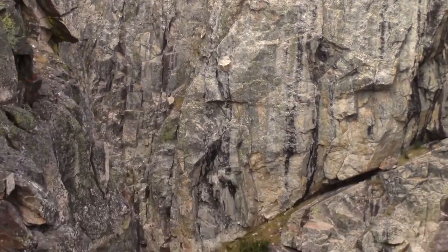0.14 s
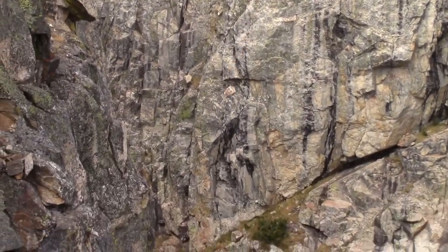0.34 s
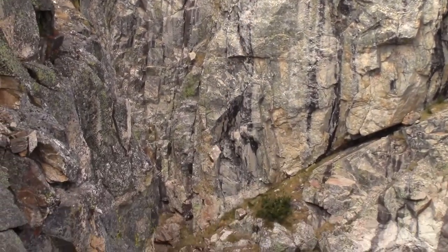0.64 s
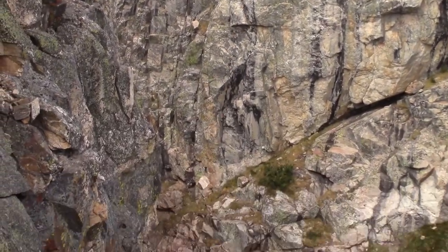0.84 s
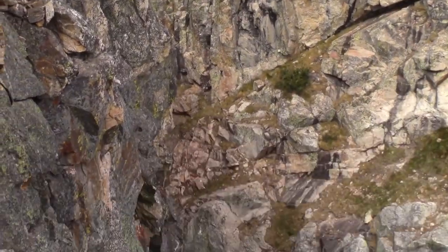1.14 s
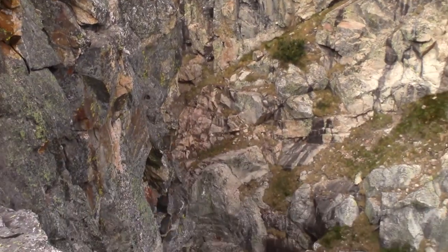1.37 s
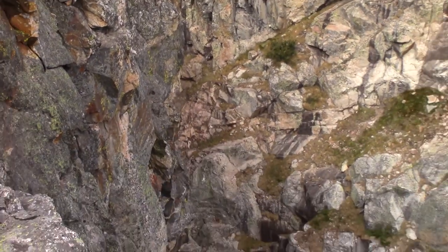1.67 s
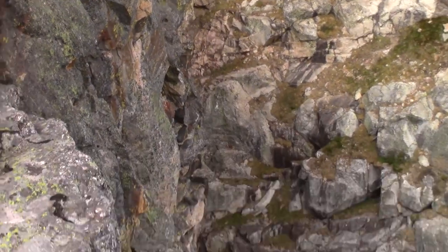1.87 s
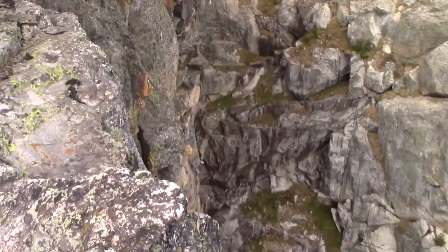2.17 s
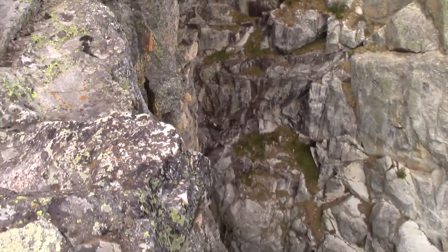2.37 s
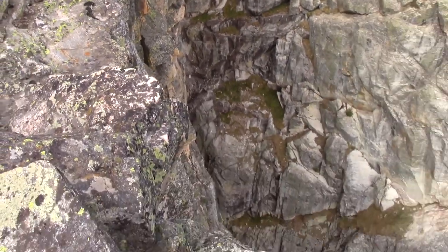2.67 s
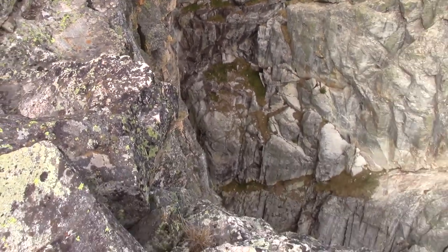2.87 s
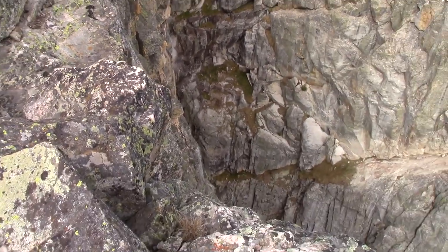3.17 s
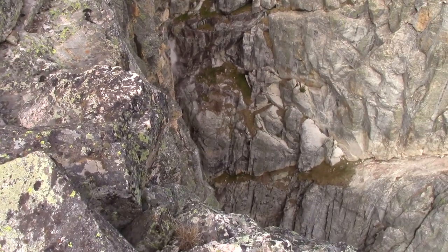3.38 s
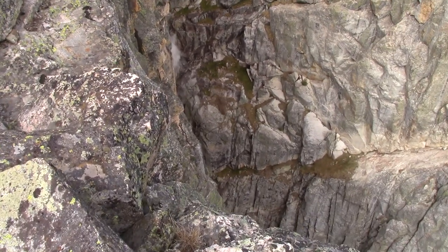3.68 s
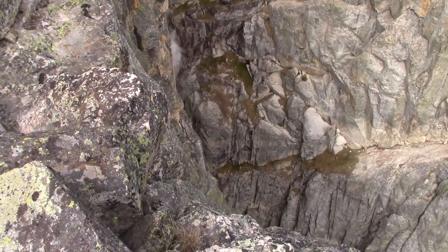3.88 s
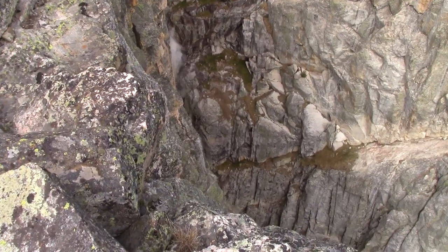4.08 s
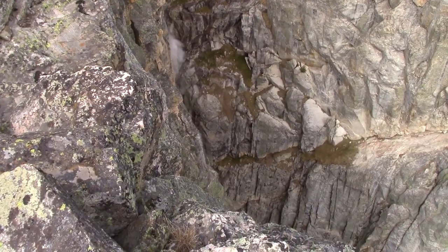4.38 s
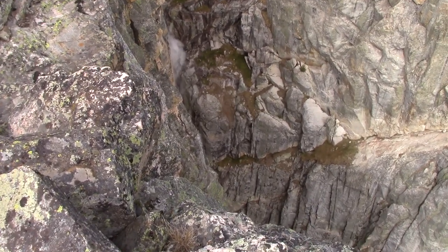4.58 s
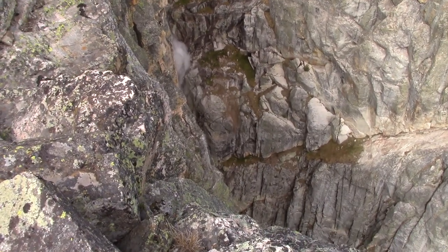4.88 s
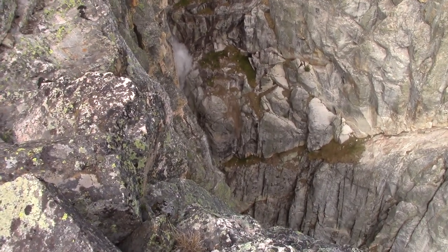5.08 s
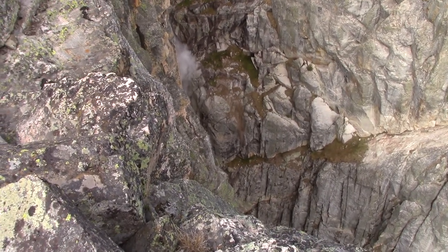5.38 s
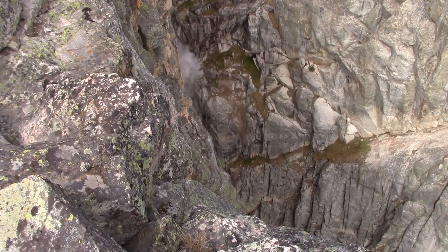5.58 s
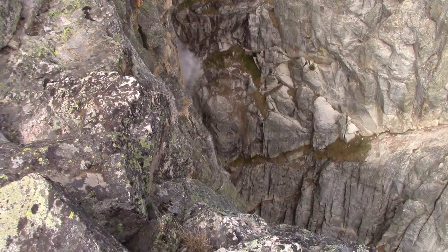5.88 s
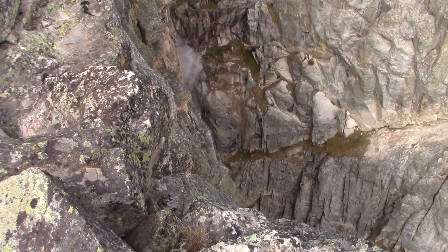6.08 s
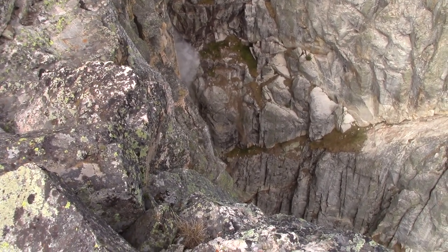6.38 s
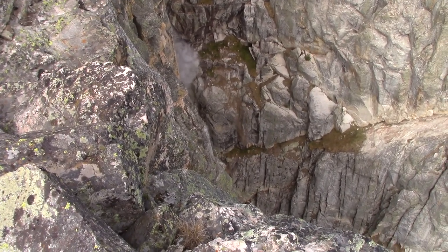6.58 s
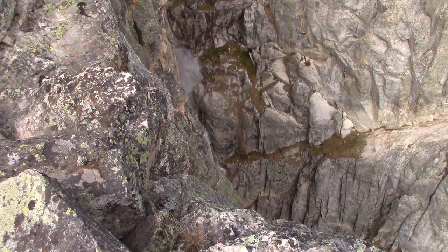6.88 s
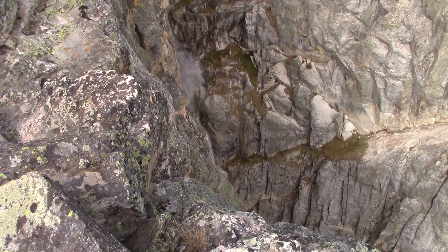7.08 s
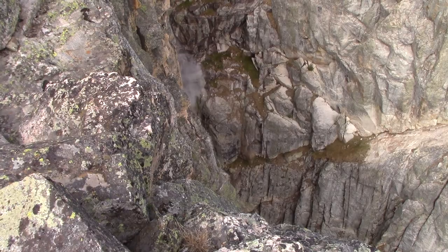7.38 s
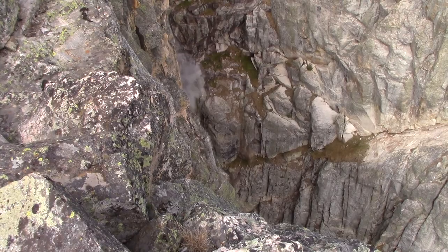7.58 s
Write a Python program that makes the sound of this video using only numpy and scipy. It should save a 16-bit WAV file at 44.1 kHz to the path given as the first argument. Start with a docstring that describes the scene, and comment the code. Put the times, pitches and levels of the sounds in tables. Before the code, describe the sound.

In a rocky gully, a brief gust buffets the microphone and a few loose stones click nearby over a faint trickle of grit. About two seconds in, a boulder smashes loudly far below. A slide of debris follows, a hollow, surging roar dotted with dry cracks, crunches and dull thuds. The cliff walls add a short echo, and the slide eases a little but keeps going.

```python
"""In a cliff gully, wind buffets the microphone and loose stones knock; then a boulder smashes far below.
A slide of debris roars on between the walls: countless collisions superpose into noise, and single
blows and dull thuds stand out of it. Rock is heavily damped, so each blow is a snap and a crunch
that hardly rings. The walls reflect the blows and thuds, and the cleft adds its hollow resonance."""
import sys
import numpy as np
from scipy import signal
from scipy.io import wavfile
from scipy.ndimage import uniform_filter1d, minimum_filter1d

SR = 44100
rng = np.random.default_rng(int(sys.argv[2]) if len(sys.argv) > 2 else 0)


def file_out(sig):
    """Save sig as 16-bit WAV at sys.argv[1]."""
    # one column per channel
    cols = np.atleast_2d(sig).T
    # limit, then scale
    lim = np.clip(cols, -1, 1)
    pcm = np.round(lim * 32767).astype(np.int16)
    wavfile.write(sys.argv[1], SR, pcm)


N = 341334


# rock striking rock: (time [s], level [dB], centre frequency [Hz], crunch length [ms])
ROCK_BLOWS = [(0.147, -42, 2000, 4), (0.166, -36, 1400, 3.4), (0.1847, -25.5, 3030, 4),
              (0.267, -23.5, 1380, 6.9), (0.2839, -29, 1620, 9.4), (0.441, -27.5, 2370, 8.4),
              (0.619, -33.5, 1730, 7.7), (0.675, -36, 2000, 4), (0.776, -41, 5000, 2.5),
              (0.8432, -31.5, 3870, 1.4), (0.8593, -29.5, 1230, 6), (1.021, -33.5, 3130, 9.2),
              (1.044, -21.5, 1200, 23), (1.066, -27, 5300, 2.6), (1.093, -40, 3000, 4),
              (1.112, -35.5, 1780, 25), (1.1675, -31, 1900, 10), (1.194, -30, 1800, 9),
              (1.2329, -38, 3600, 6), (1.2962, -32.5, 4000, 5.6), (1.32, -39, 3000, 11),
              (1.335, -28, 1210, 32), (1.338, -47, 5760, 6), (1.346, -29, 1270, 9), (1.352, -41, 5100, 13),
              (1.4236, -37, 2680, 10), (1.481, -34.5, 2070, 5.4), (1.5263, -33, 3300, 9.7),
              (1.534, -37, 1400, 13), (1.559, -49, 6500, 3), (1.5706, -27, 1360, 8.6),
              (1.721, -27, 2040, 5.8), (1.7697, -18.5, 1900, 10.5), (1.808, -48, 4600, 5),
              (1.83, -36.5, 2960, 12), (1.856, -32, 3460, 4.3), (1.9765, 2.5, 1110, 11),
              (1.9855, -1, 1350, 4.5), (2.0074, -6, 795, 4.2), (2.122, -9, 650, 17), (2.247, -4, 630, 20),
              (2.354, -7, 800, 9), (2.531, -21, 5500, 2.5), (2.621, -6.5, 1600, 2.4),
              (2.6403, -4.5, 2600, 2.8), (2.6928, -6, 2620, 3.6), (2.714, -13, 600, 8),
              (2.8045, 0.8, 1900, 3.4), (2.823, -5, 2400, 2), (2.889, -17, 3200, 2.4),
              (2.899, -8, 1600, 3.6), (2.978, -3, 950, 8), (2.991, -17, 3800, 2.6), (3.016, -12, 660, 10),
              (3.035, -15, 3400, 4.7), (3.0858, -11, 2010, 4.2), (3.093, -10, 1080, 5.5),
              (3.1133, -12, 2640, 9.8), (3.3225, -2.5, 950, 3.6), (3.391, -9, 1200, 3.8),
              (3.436, -10, 2000, 8.2), (3.4658, -7.5, 1600, 4.5), (3.5264, -6.5, 2550, 1.8),
              (3.5405, -8, 800, 6), (3.546, -4, 950, 11), (3.5885, 1, 2100, 4), (3.6063, -4, 2340, 2.6),
              (3.78, -8, 1250, 4.7), (3.8579, -10.5, 750, 5.1), (3.8852, -12, 2660, 3.5),
              (3.979, -6, 1320, 2), (4.099, -14, 1320, 5.2), (4.1455, -1.5, 1100, 3.6),
              (4.2315, -2.5, 710, 4.8), (4.243, -14, 660, 12), (4.233, -10, 2300, 3.5),
              (4.31, -17, 1610, 3.3), (4.3395, -5, 1900, 3.6), (4.345, -4, 700, 5.8), (4.41, -7, 1490, 5),
              (4.4255, -2, 1400, 6), (4.436, -8, 600, 9), (4.5, -8, 520, 11), (4.52, -2, 1950, 2.4),
              (4.5707, -12, 1170, 4.4), (4.6105, -20, 4500, 3.1), (4.6176, -0.5, 720, 4.6),
              (4.628, -9, 640, 26), (4.766, -10.5, 3270, 3.2), (4.8592, -10.5, 1020, 10.2),
              (5.0088, -7.5, 1240, 1.5), (5.0273, -8, 960, 3.1), (5.0637, -11, 1190, 7),
              (5.1245, -12.5, 3430, 3.8), (5.1466, -13.5, 725, 5.7), (5.2695, -7, 1900, 6),
              (5.253, -16, 2450, 4.5), (5.3514, -10.5, 1270, 16), (5.4012, -8, 1440, 2.5),
              (5.5015, -16, 4170, 2.5), (5.744, -10.5, 1100, 3.5), (5.7988, -10.5, 1740, 2.7),
              (6.0698, -8.5, 800, 5.5), (6.1522, -8, 1450, 5.3), (6.342, -9.5, 1340, 8.9),
              (6.415, -10, 2100, 5.6), (6.4315, -1, 2050, 2.8), (6.6501, -11, 1350, 3.5),
              (6.732, -15.5, 676, 5), (6.7755, -18, 5400, 4), (6.8965, -12, 754, 6),
              (7.043, -13, 1620, 2.8), (7.1185, -3, 1700, 2.9), (7.1195, -11, 3150, 4),
              (7.149, -13, 990, 4.1), (7.4939, -16.5, 3200, 4.1), (7.665, -13.5, 686, 5)]
# thin splinters cracking off: (time [s], level [dB], centre frequency [Hz])
ROCK_SPLINTERS = [(2.451, -29, 6500), (2.687, -29, 6500), (2.804, -29, 7500), (3.034, -25, 6500),
                  (3.286, -33, 6500), (3.5894, -15, 7950), (3.9215, -37, 6500), (4.111, -36, 7000),
                  (4.232, -30, 7000), (4.389, -36, 5500), (4.434, -26, 6000), (4.5134, -31, 7500),
                  (4.609, -28, 8500), (5.161, -26, 6500), (5.5243, -32, 6500), (6.432, -28, 7500),
                  (6.9706, -33, 6500), (7.1177, -32, 6800), (7.407, -34, 6500)]

def blows(splinter_ms=1.8, scrape_ms=13):
    """Damped impact: a snap and a gritty crunch; rock hardly rings, so the spectrum is one broad hump."""
    out, ms = np.zeros(N), np.arange(3000) / SR * 1000
    crash_s = DEBRIS_WAVES[0][0]
    for s, db, hz, length in ROCK_BLOWS + [(*row, splinter_ms) for row in ROCK_SPLINTERS]:
        near = s < crash_s  # the first loose stones are close by and keep more of their range
        octaves = 0.25 + 0.03 * length + 0.067 * near
        dull_db = 0 if near else -1.5  # air absorption over distance
        decay_ms = max(length - 2.2, .2)
        grit = rng.standard_normal(len(ms)) * rng.exponential(1, len(ms)) ** 0.57
        crunch = 0.34 * grit * (np.exp(-(ms / decay_ms) ** 3) + 0.21 * np.exp(-ms / (decay_ms + 4)))
        scrape = max(length / scrape_ms, 1) - 1  # a long crunch swells in after a softer snap
        crunch *= 1 - np.exp(-(ms + .05) / (2.4 * scrape + .01))
        crunch[0] = 1 / (1 + 1.3 * scrape)  # the snap
        low, high = hz / 2 ** octaves, min(hz * 2 ** octaves, 10000)
        hump = [(low / 8, -52), (low / 2, -12), (low, -3), (hz, 0), (high, -6),
                (1.675 * high, -24 + dull_db), (5.1 * high, -72 + 2 * dull_db)]
        add(out, s, peaked(coloured(crunch, hump), db))
    return out


# roar of sliding rock, before its bands are levelled: (frequency [Hz], relative level [dB])
ROAR_SPECTRUM = [(24, -93), (40, -30), (110, -22), (241, -7.5), (287, -6), (397, -8.5), (565, 2),
                 (654, 3.5), (779, -2), (1690, -4.5), (3150, -12.5), (4820, -22.5), (8990, -41.5),
                 (14100, -61.5), (15600, -69)]

def debris(drift_db=2.5):
    """Superposition: countless stones of many sizes collide, and distance blurs them into a roar."""
    edges = np.geomspace(100, 12800, 8)
    clatter = evened(sum(gain_of(-1.4 * np.log2(low / 800) * (low > 800)) * stones((low, high))
                         for low, high in zip(edges, edges[1:])))
    collisions = (rng.standard_normal(N) + 0.4 * clatter) * gain_of(0.75 * lumps(samples=1000))
    hz, spectrum = np.fft.rfftfreq(N, 1 / SR), np.fft.rfft(coloured(collisions, ROAR_SPECTRUM))
    lowpasses = [1 / (1 + (hz / edge) ** 8) for edge in (420, 620, 850, 1800, 3500, 1e6)]
    bands = np.diff(lowpasses, axis=0, prepend=0)
    bass, low_boom, high_boom, body, upper, treble = (np.fft.irfft(spectrum * b, N) for b in bands)
    lean = gain_of(drift_db * lumps(samples=2500))  # the hollow note leans now higher, now lower
    boom = low_boom * lean + high_boom / lean
    gains = flow()
    gains[0] *= gain_of(1.95 * lumps(samples=1500))  # the few big blocks make the bass come in lumps
    return sum(gain * evened(band) for gain, band in zip(gains, (bass, boom, body, upper, treble)))


def stones(band_hz, per_s=260, spread_db=2.5):
    """Poisson process: stones of one size click at random, mostly softly, a few loudly."""
    clicks = gain_of(spread_db * np.minimum(rng.exponential(1, N), 4)) * (rng.random(N) < per_s / SR)
    clicks *= rng.uniform(-0.96, 1, N)
    return signal.sosfilt(signal.butter(2, band_hz, "band", fs=SR, output="sos"), clicks)


# loose grit trickling, heard before the crash: (time [s], level [dB], weight of big stones [dB])
GRIT_TRICKLE = [(0, -57.5, 8.5), (0.45, -53, 2), (0.85, -60, 4), (1.05, -58, 4), (1.21, -48, -0.5),
                (1.36, -49.5, -4), (1.6, -51.5, 2), (1.8, -53, -2), (1.97, -46.5, 3)]
# the crash, its rumble, its return from the far walls, the long slide, then surges within it:
# (time [s], rise [s], level [dB], decay rate [dB/s], weight of big blocks [dB])
DEBRIS_WAVES = [(1.974, 0.003, -11.5, 158, 3), (1.98, 0.065, -26, 31, 16), (2.05, 0.18, -14.5, 18.5, 1),
                (2.3, 0.31, -29, 0.16, 0.5), (3.0, 0.22, -26, 22, -4), (3.38, 0.096, -21, 26.5, -2),
                (3.72, 0.058, -22.5, 25, -3.5), (4.07, 0.072, -22.5, 10, 4.5), (4.33, 0.29, -26, 47, 6.5),
                (4.85, 0.056, -28.5, 26, 4.5), (5.32, 0.11, -25, 15, 0), (5.72, 0.12, -29, 25, 9.5),
                (6.0, 0.065, -22.5, 50, 5), (6.25, 0.13, -26.5, 12, 2), (6.7, 0.37, -34.5, -3.5, 12),
                (7.58, 0.16, -27.5, 12, -5)]
# fine grit bursting, then spraying on: (time [s], rise [s], hold [s], level [dB], decay rate [dB/s])
GRIT_SPRAY = [(1.972, 0.0035, 0.018, -31.5, 137), (2.073, 0.078, 2.26, -36, 3)]

def flow():
    """Incoherent sources add in power: the gains of the roar's five bands, from bass to treble."""
    band_db = np.array([-13.5, -6, -1.4, -5.2])[:, None]  # bass, boom, body, upper body
    per_weight = np.array([0.92, 0.84, 0.0, -0.2])[:, None]  # big blocks favour the low bands
    times, *columns = np.transpose(GRIT_TRICKLE)
    trickle_db, trickle_weight = (np.interp(np.arange(N) / SR, times, column) for column in columns)
    power = gain_of(trickle_db + per_weight * trickle_weight) ** 2
    for start, rise, db, fall, weight in DEBRIS_WAVES:
        power += (gain_of(db + per_weight * weight) * swell(start, rise, 0, fall)) ** 2
    treble_power = gain_of(trickle_db - 14.5) ** 2
    for start, rise, hold, db, fall in GRIT_SPRAY:
        treble_power += (gain_of(db) * swell(start, rise, hold, fall)) ** 2
    return [*gain_of(band_db) * np.sqrt(power), np.sqrt(treble_power)]


# dull low thuds and deep bumps of wind on the microphone: (time [s], level [dB], frequency [Hz])
LOW_THUDS = [(0.719, -42, 141), (1.47, -46, 170), (1.716, -37.5, 198), (3.312, -20, 306),
             (3.468, -19.5, 212), (3.405, -33, 129), (3.82, -32, 120), (4.128, -27, 320), (4.247, -18, 216),
             (4.493, -15, 356), (4.59, -27.5, 101), (4.965, -15, 213), (5.075, -26, 130), (5.11, -29, 110),
             (5.325, -29, 131), (5.415, -29, 111), (5.671, -12, 182), (6.894, -21, 322), (7.115, -21, 260)]

def thuds():
    """Heavy damping: dull low thuds and deep bumps of wind die away within a few cycles."""
    return pushes(LOW_THUDS, roughness=1.76, decay_cycles=0.67)


# gusts of wind: (time [s], length [s], level [dB])
WIND_GUSTS = [(0.075, 0.031, -32), (0.1, 0.093, -26), (0.21, 0.021, -45), (0.28, 0.085, -36.5),
              (0.369, 0.064, -32.5), (0.456, 0.09, -41)]
# single puffs: (time [s], level [dB], frequency [Hz])
WIND_PUFFS = [(0.109, -20, 330), (0.133, -14, 400), (0.143, -19, 260), (0.157, -17, 290), (0.164, -17, 450),
              (0.169, -15, 197), (0.18, -21, 278), (0.198, -13.5, 392), (0.235, -25, 197),
              (0.296, -27, 212), (0.314, -22, 174), (0.416, -17.5, 315), (0.471, -27.5, 198)]
# rumble of the eddies: (frequency [Hz], relative level [dB])
WIND_SPECTRUM = [(18, -68), (40, -32), (120, -1.5), (260, -3), (509, -19), (955, -41), (1190, -40),
                 (1600, -56), (2500, -61), (3250, -68), (5500, -120)]

def wind(rise_s=0.029, fall_db_per_s=700):
    """Turbulence: eddies strike the microphone as a lumpy rumble with single puffs."""
    gusts = sum(gain_of(db) * swell(s, rise_s, length - rise_s, fall_db_per_s)
                for s, length, db in WIND_GUSTS)
    eddies = rng.standard_normal(N) * gain_of(2.3 * lumps(samples=120))
    rumble = evened(coloured(eddies, WIND_SPECTRUM))
    return gusts * rumble + pushes(WIND_PUFFS, roughness=0.92, decay_cycles=0.58)


def gully(x, echoes_per_s=3000, walls_t60_s=0.16, cleft_t60_s=0.26, cleft_hz=620):
    """Reverberation: scattered reflections from the rock walls, with the resonance of the cleft."""
    t = np.arange(SR // 2) / SR
    echoes = rng.choice([-1., 1.], len(t)) * (rng.random(len(t)) < echoes_per_s / SR) * (t > .004)
    walls = signal.lfilter([1], [1, -.6], echoes) * gain_of(-60 * t / walls_t60_s)
    cleft = signal.lfilter(*signal.iirpeak(cleft_hz, 2.5, SR), echoes) * gain_of(-60 * t / cleft_t60_s)
    return signal.oaconvolve(x, walls / np.linalg.norm(walls) + 0.58 * cleft / np.linalg.norm(cleft))[:N]


# noise floor: (frequency [Hz], relative level [dB])
HISS_SPECTRUM = [(24, -56), (40, -23), (139, -8.5), (450, -3), (723, -20), (4470, -22), (12000, -36.5),
                 (15600, -44)]

def hiss(db=-60):
    """Stationary noise: the steady sound of the air and the microphone."""
    return gain_of(db) * evened(coloured(rng.standard_normal(N), HISS_SPECTRUM))


def pushes(rows, roughness, decay_cycles):
    """Damped oscillation: soft low pushes, two or three cycles long, roughened by phase noise."""
    out, t = np.zeros(N), np.arange(4000) / SR
    for s, db, hz in rows:
        cycles = hz * t
        wobble = roughness * np.cumsum(rng.standard_normal(len(t))) * np.sqrt(hz / SR)
        envelope = cycles ** 1.05 * np.exp(-cycles / decay_cycles)
        push = envelope * np.sin(2 * np.pi * cycles + uniform_filter1d(wobble, 60))
        # air follows the change of the push, not its mean
        add(out, s, peaked(signal.lfilter(*signal.butter(2, 0.65 * hz, "high", fs=SR), push), db))
    return out


def swell(start, rise, hold, fall_db_per_s):
    """Exponential decay after a smooth rise and a hold."""
    t = np.arange(N) / SR - start
    attack = np.sin(np.pi / 2 * np.clip(t / rise, 0, 1)) ** 2
    return attack * gain_of(-abs(fall_db_per_s) * np.maximum(t - rise - hold, 0))


def lumps(samples):
    """Smoothed noise: a slow random fluctuation of rms 1."""
    return evened(uniform_filter1d(uniform_filter1d(rng.standard_normal(N), samples), samples))


def coloured(x, points):
    """Minimum-phase filtering along a curve of (frequency [Hz], level [dB])."""
    f, db = np.transpose(points)
    hz = abs(np.fft.fftfreq(8192, 1 / SR))
    log_gain = np.log(gain_of(np.interp(np.log(hz + 1), np.log(f + 1), np.maximum(db, -100))))
    taps = np.fft.ifft(np.exp(signal.hilbert(log_gain).conj())).real[:4096]
    return signal.oaconvolve(x, taps)[:len(x)]


def gain_of(db):
    return 10 ** (np.asarray(db) / 20)


def evened(x):
    return x / np.sqrt(np.mean(x ** 2) + 1e-20)


def peaked(x, db):
    return gain_of(db) * x / abs(x).max()


def add(mix, s, sound):
    part = mix[round(s * SR):][:len(sound)]
    part += sound[:len(part)]


def scene():
    """Linear superposition: impacts, their reflections, debris, wind and hiss sum in one channel."""
    hits = blows() + thuds()
    return (hits + gain_of(-17.5) * gully(hits) + debris() + wind() + hiss())[None]


def record(dry, ceiling=.94, span_samples=89, edge_hz=15725):
    """Band and peak limiting: the microphone drops deep bass; a quick limiter and a low-pass follow."""
    thin = signal.sosfilt(signal.butter(3, 75, "high", fs=SR, output="sos"), dry)
    gain = minimum_filter1d(ceiling / np.maximum(abs(thin), ceiling), span_samples)
    limited = thin * uniform_filter1d(uniform_filter1d(gain, span_samples // 2), span_samples // 2)
    lowpass = signal.firwin(511, edge_hz, window=("kaiser", 9), fs=SR)
    return signal.oaconvolve(limited, lowpass[None], "same")


dry = scene()
out = record(dry)
file_out(out)
```